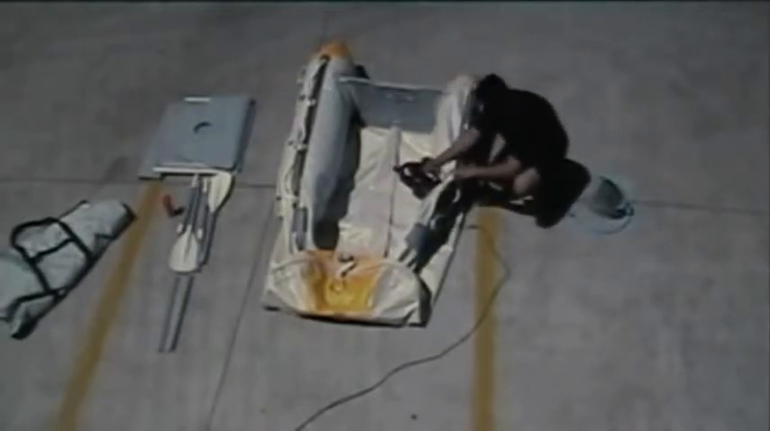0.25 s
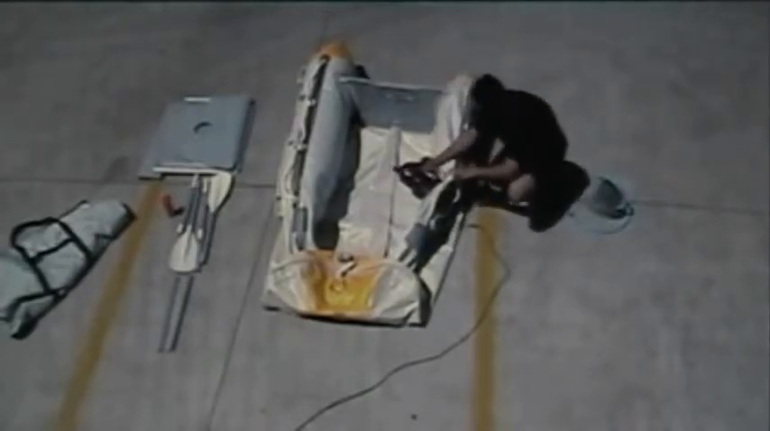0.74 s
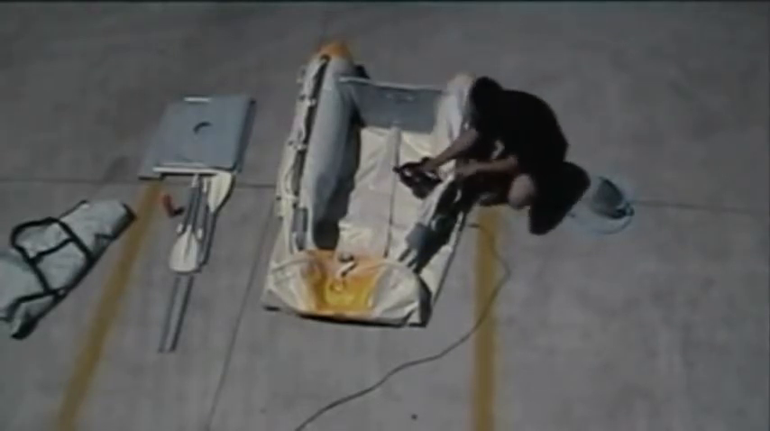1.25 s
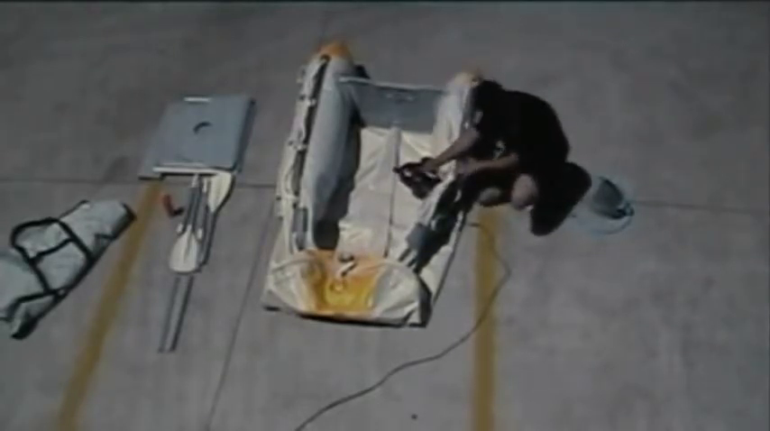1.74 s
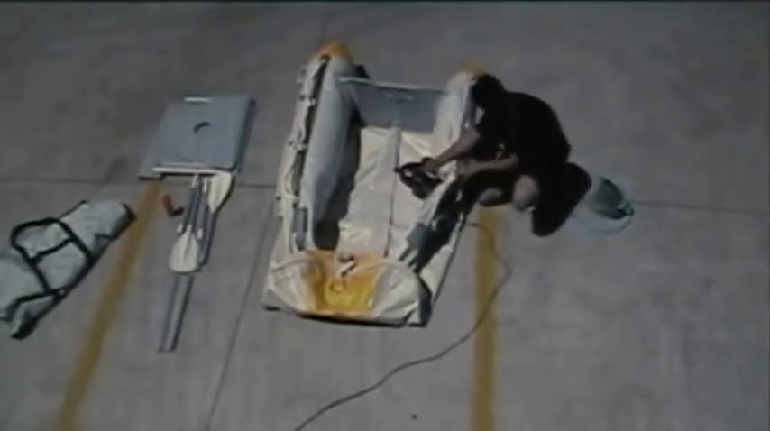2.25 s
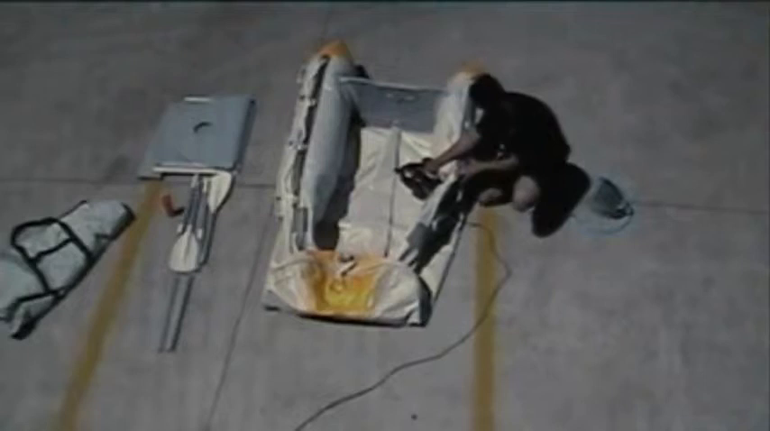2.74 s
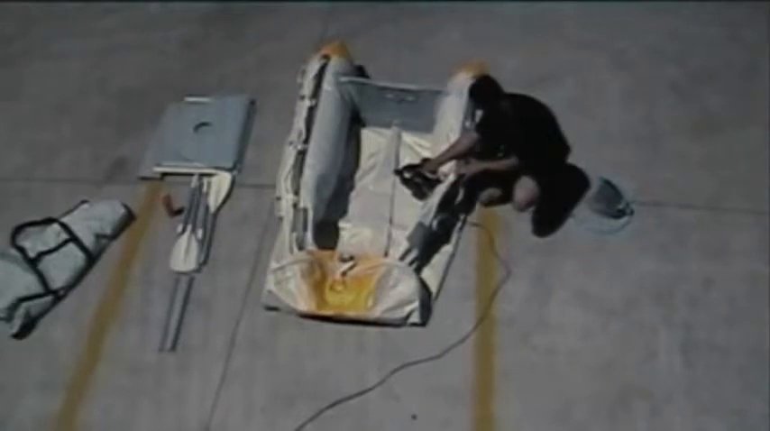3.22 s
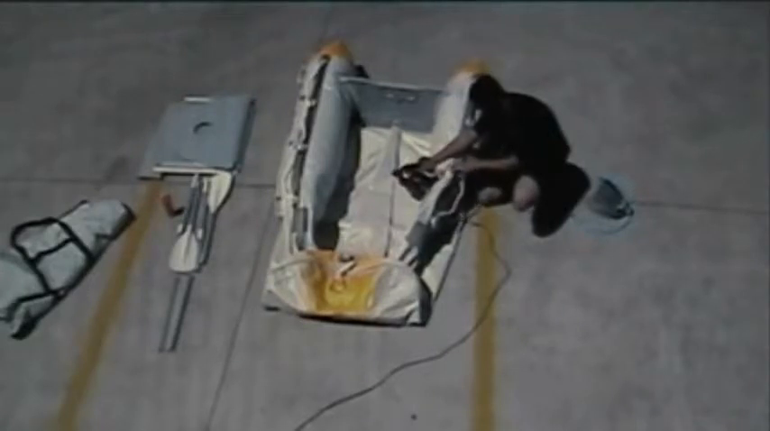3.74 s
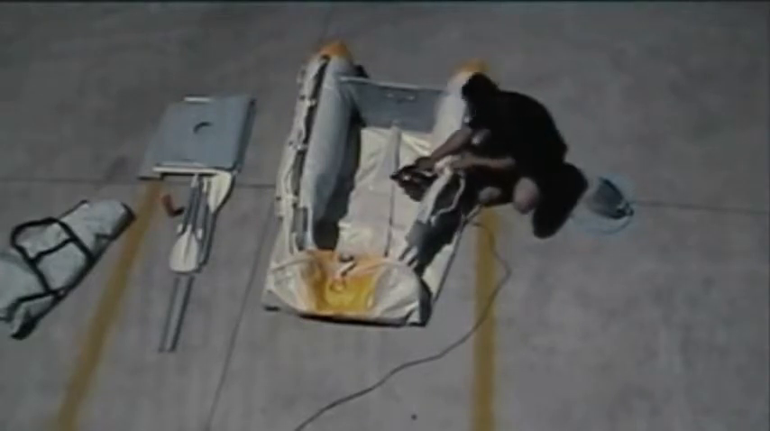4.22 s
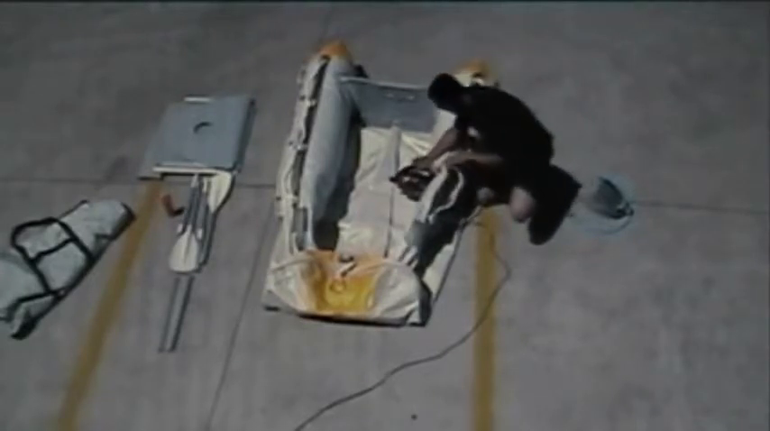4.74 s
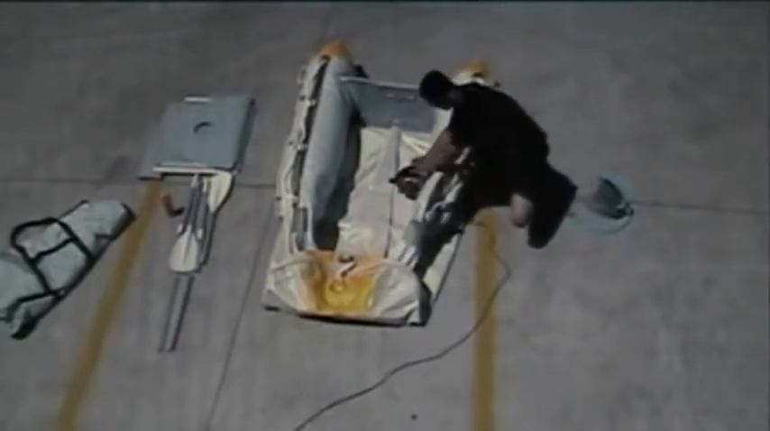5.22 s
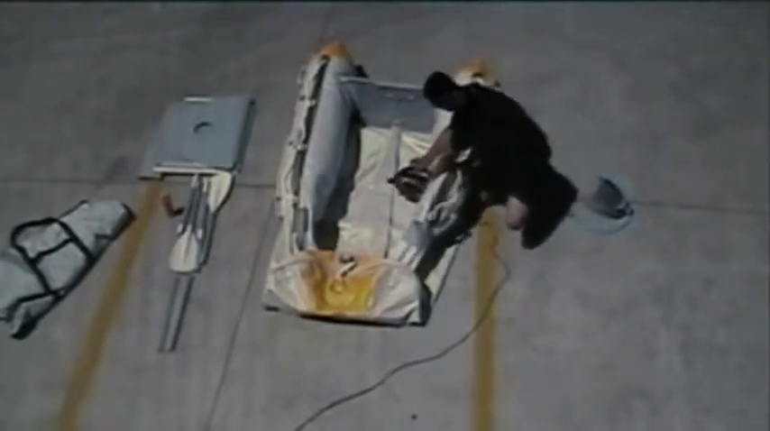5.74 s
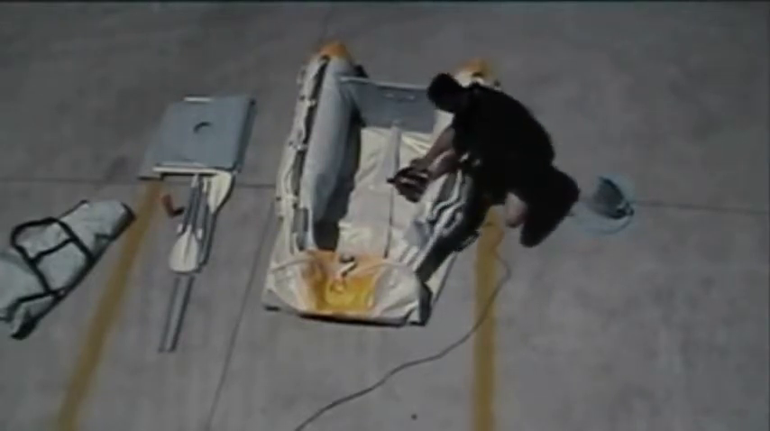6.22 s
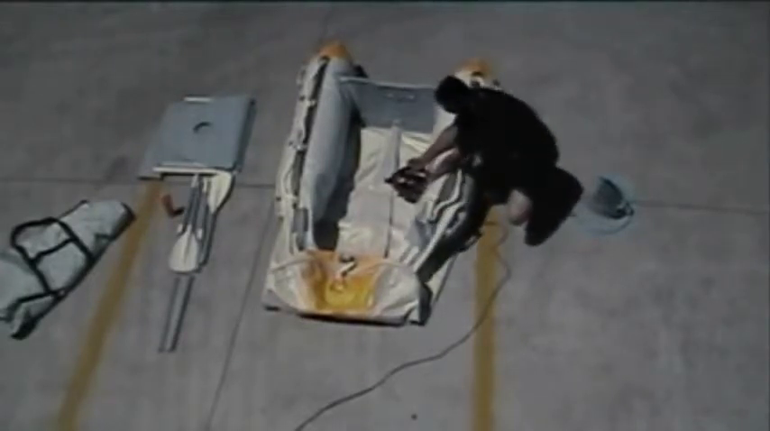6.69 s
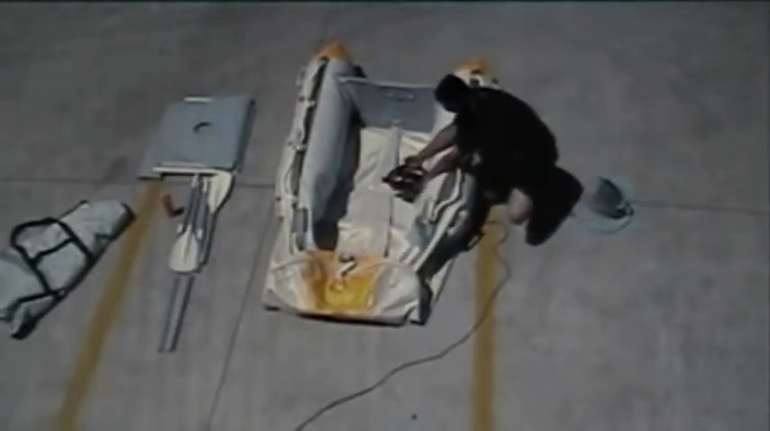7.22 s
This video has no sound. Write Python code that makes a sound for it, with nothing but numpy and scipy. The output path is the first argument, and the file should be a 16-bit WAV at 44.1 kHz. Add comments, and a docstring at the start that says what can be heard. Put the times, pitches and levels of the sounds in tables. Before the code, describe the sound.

An electric air blower runs throughout, pushing air into an inflatable boat with an even roar and hiss over a faint motor tone. After about a second the hose starts to sputter in soft, irregular puffs. Midway the sputtering stops, the valve whistles thinly and the hiss dulls a little. A brighter spurt of air and one last puff come near the end. The blower sits slightly right, with a short echo from a hard surface.

```python
"""A mains air blower runs steadily, held to the valve of an inflatable boat on a concrete floor.
From the start its shaft sings over a faint hum, while turbulent air roars in housing and hose, booms in
the boat's tube and hisses at the nozzle; a hard surface nearby returns a short echo. After a second the
hose begins to sputter. Midway the nozzle settles deeper into the valve: the sputter stops, the valve
whistles and the hiss dulls. Near the end come a bright spurt of air and one last puff."""
import sys
import numpy as np
from scipy import signal
from scipy.fft import rfft, irfft
from scipy.io import wavfile
from scipy.ndimage import uniform_filter1d

SR = 44100
rng = np.random.default_rng(int(sys.argv[2]) if len(sys.argv) > 2 else 0)


def file_out(sig):
    """Save sig as 16-bit WAV at sys.argv[1]."""
    # one column per channel
    cols = np.atleast_2d(sig).T
    # limit, then scale
    lim = np.clip(cols, -1, 1)
    pcm = np.round(lim * 32767).astype(np.int16)
    wavfile.write(sys.argv[1], SR, pcm)


N = 328986
TIME, HZ = np.arange(N) / SR, np.maximum(np.arange(N // 2 + 1) * SR / N, 1)


def from_db(db):
    """Amplitude ratio: tenfold for every 20 dB."""
    return 10 ** (np.asarray(db) / 20)

def in_time(points):
    """Linear interpolation of a curve at every sample."""
    return np.interp(TIME, *np.transpose(points))

def over_hz(points):
    """Linear interpolation on a log-frequency axis."""
    hz, value = np.transpose(points)
    return np.interp(np.log(HZ), np.log(hz), value)

def drift(rate_hz):
    """Random modulation: low-passed noise of rms 1."""
    slow = irfft(rfft(rng.standard_normal(N)) / (1 + (HZ / rate_hz) ** 2), N)
    return slow / np.sqrt(np.mean(slow ** 2) + 1e-20)

def swell(peak_s, length_s):
    """Hann window: a smooth rise to 1 and fall."""
    return np.cos(np.pi * np.clip((TIME - peak_s) / length_s, -.5, .5)) ** 2

def resonances(modes):
    """Incoherent sum: independently driven modes add in power."""
    gains = (from_db(db) / (1 + ((HZ - hz) / width) ** 2) for hz, width, db in modes)
    return np.sqrt(sum(gain ** 2 for gain in gains))

# Sound arriving from all round: frequency_hz, side_minus_mid_db
DIFFUSE_FIELD = [(60, -5), (150, -8), (200, -5), (330, -9), (550, -15), (800, -16), (1150, -6),
                 (1550, -11.5), (2200, -10.5), (3400, -8), (4500, -17), (6300, -5.5), (8200, -9),
                 (11000, -2.5), (15000, -3)]
def turbulence(colour, blur_hz=220):
    """Shaped noise as (mid, side), mid rms 1; multipath arrival blurs the side's resonances."""
    blurred = np.sqrt(np.abs(uniform_filter1d(colour ** 2, max(1, int(blur_hz * N / SR)))))
    side_colour = blurred * from_db(over_hz(DIFFUSE_FIELD))
    noise = irfft(rfft(rng.standard_normal((2, N))) * [colour, side_colour], N)
    return noise / np.std(noise[0])

def cavity(modes, level_db, flutter_db, flutter_hz):
    """Forced resonance: uneven turbulence drives a cavity's modes."""
    return from_db(level_db + flutter_db * drift(flutter_hz)) * turbulence(resonances(modes))

# Strength of the air flow: time_s, above_usual_db
AIR_FLOW = [(0, 0), (0.65, 1.4), (0.95, -2.2), (1.25, -0.8), (1.5, -1), (1.9, 0), (2.6, 0.5), (3.25, -1.5),
            (3.65, -0.5), (3.85, 0.5), (4.04, 0), (4.2, -3), (5.0, -2.5), (5.3, -1), (5.5, -2.5), (5.7, 3),
            (6.08, -1.7), (6.25, -0.3), (7.46, 0.7)]
def flow_db():
    """Continuity: one flow passes through housing, hose, nozzle and valve."""
    return in_time(AIR_FLOW)

# Background spectrum: frequency_hz, relative_density_db
RUMBLE_SPECTRUM = [(20, -28), (45, -8), (70, -0.5), (120, -9), (180, 1), (260, 3.5), (400, -10),
                   (1000, -19.5)]
def rumble(level_db):
    """Ambient noise: a steady floor, strongest in the bass."""
    return from_db(level_db) * turbulence(from_db(over_hz(RUMBLE_SPECTRUM)), blur_hz=20)

# Shaft rotation: time_s, speed_hz
SHAFT_SPEED = [(0, 555), (.9, 556.5), (1.85, 557), (2.8, 557.2), (4.0, 559.6), (4.7, 560.3), (5.4, 558.8),
               (6.4, 556.5), (7.46, 557.5)]
# Strength of the shaft's note: time_s, relative_level_db
SHAFT_LEVEL = [(0, -40), (.55, -40), (1.0, -43.5), (1.35, -37), (2.4, -40.5), (2.95, -47), (3.4, -36.5),
               (3.8, -37.5), (4.2, -40), (4.7, -39.5), (5.45, -44.5), (6.2, -37.5), (6.7, -35),
               (7.05, -42.5), (7.46, -45.5)]
def motor(wobble_hz, waver_db, note_gain_db=0.5, whine_db=-53, whine_order=6):
    """Rotating imbalance: the shaft sings at its turning rate, the impeller at a harmonic."""
    speed_hz = in_time(SHAFT_SPEED) + wobble_hz * drift(7.8)  # trembles under the load
    angle = 2 * np.pi * np.cumsum(speed_hz) / SR
    note = from_db(in_time(SHAFT_LEVEL) + note_gain_db + waver_db * drift(8.0)) * np.sin(angle)
    whine = from_db(whine_db + waver_db * drift(4.9)) * np.sin(whine_order * angle)
    return np.sqrt(2) * (note + whine)

# Machine tones: pitch_hz, rms_level_db
HUM_TONES = [(48.4, -74), (99, -80), (149, -74), (296.1, -64.5), (339.1, -67), (764.4, -56.5), (1148, -52),
             (1286, -49)]
def hum(wander, waver_db):
    """Superposition: faint tones of nearly fixed pitch, each wavering in level."""
    clock = TIME + wander * np.cumsum(drift(4.1)) / SR
    return np.sqrt(2) * sum(from_db(db + waver_db * drift(1.9)) * np.sin(2 * np.pi * hz * clock)
                            for hz, db in HUM_TONES)

# Modes of the blower's housing: centre_hz, half_width_hz, relative_level_db
HOUSING_RESONANCES = [(1199, 34, -9.5), (1298, 40, -3.5), (1354, 23, 1.5), (1396, 29, -3), (1627, 33, -1),
                      (2046, 68, -6.5), (2225, 35, -10), (2314, 39, -10.5), (2283, 260, -7),
                      (2560, 59, -8.5), (2697, 5.7, -2.5), (2650, 150, -13), (2990, 190, -15)]
def housing_roar(level_db):
    """Cavity resonance: the housing roars in proportion to the flow."""
    return cavity(HOUSING_RESONANCES, level_db + flow_db(), flutter_db=0.5, flutter_hz=28)

# Modes of the hose: centre_hz, half_width_hz, relative_level_db
HOSE_RESONANCES = [(767, 24, 0), (816, 35, -3.5), (909, 61, -6)]
def hose_roar(level_db, tube_coupling=0.24):
    """Acoustic coupling: the hose follows the flow and shares the swing of the tube it opens into."""
    drive_db = level_db + flow_db() + tube_coupling * aim_db()
    return cavity(HOSE_RESONANCES, drive_db, flutter_db=1.0, flutter_hz=21)

# Modes of the boat's tube: centre_hz, half_width_hz, relative_level_db
TUBE_RESONANCES = [(208, 72, -28.5), (448, 28.3, -9.5), (543, 34, -0.5), (570, 21, -5), (627, 31, -1)]
# Boom inside the tube as the nozzle's aim changes: time_s, level_db
BOOM_LEVEL = [(0, -38), (1.1, -34), (1.8, -31.5), (3.6, -30.5), (3.9, -26.5), (4.08, -30), (4.2, -38.5),
              (5.1, -40), (5.3, -37), (5.48, -40.5), (5.7, -35), (7.0, -36), (7.2, -33.5), (7.46, -31)]
def tube_boom(wall_loss_db):
    """Transmission loss: the tube's air resonates and is heard through its wall."""
    return cavity(TUBE_RESONANCES, in_time(BOOM_LEVEL) - wall_loss_db, flutter_db=0.6, flutter_hz=22)

def aim_db():
    """Varying excitation: the nozzle's aim swings the boom about its mean level."""
    boom_db = in_time(BOOM_LEVEL)
    return boom_db - boom_db.mean()

# Modes of the gap between nozzle and valve: centre_hz, half_width_hz, relative_level_db
GAP_RESONANCES = [(1522, 49, -2), (1595, 16, -3.5)]
# Strength of their ring: time_s, level_db
GAP_LEVEL = [(0, -33.5), (1.1, -37), (1.3, -35), (1.9, -32.5), (2.4, -35), (3.68, -37.5), (3.86, -30),
             (4.04, -37), (4.2, -40), (5.5, -42), (5.8, -35), (6.05, -36), (7.46, -39)]
def gap_ring():
    """Slit resonance: the gap rings louder and softer as the hands shift."""
    return cavity(GAP_RESONANCES, in_time(GAP_LEVEL), flutter_db=0.86, flutter_hz=12)

# Modes of the valve: centre_hz, half_width_hz, relative_level_db
VALVE_RESONANCES = [(1703, 21, 0.5), (1778, 28, 2.5), (1831, 29, 3), (1920, 76, -6.5)]
def valve_ring(level_db, flow_share=0.5, seated_gain_db=3):
    """Cavity resonance: the valve's ring grows with the flow and as the nozzle seats."""
    drive_db = level_db + flow_share * flow_db() + seated_gain_db * seating()
    return cavity(VALVE_RESONANCES, drive_db, flutter_db=0, flutter_hz=33)

# Relative spectrum of the jet: frequency_hz, loose_db, seated_db
JET_SPECTRUM = [(150, -29.5, -31), (403, -11, -11.5), (850, -14, -2), (1070, -12, -9), (1400, -3, -6),
                (3350, -4.5, -4), (4320, -6, -6.5), (5030, -8.5, -8), (6830, -4, -6), (7800, 0.5, 1),
                (8280, -1.5, -2), (8520, -1.5, -4.5), (9230, -3, -2.5), (11100, -11, -12), (11700, -8, -9),
                (14000, -12, -11.2), (15100, -19.5, -20.5)]
# Its narrow whistles, on the same scale: centre_hz, half_width_hz, loose_db, seated_db
JET_PEAKS = [(4400, 60, -2.5, -6), (6205, 33, -0.5, -3), (6864, 17, -6, -6), (7420, 60, -10, 1),
             (7800, 60, -8, -5), (8025, 41, 3, -8), (8268, 30, -4, -1), (8410, 20, -6, -2),
             (9560, 24, -4, -10), (12170, 65, -9, -8)]
def jet_noise(seated):
    """Jet noise: broadband hiss and thin whistles add in power, for a loose or a seated nozzle."""
    bed = over_hz([(hz, db[seated]) for hz, *db in JET_SPECTRUM])
    whistles = resonances([(hz, width, db[seated]) for hz, width, *db in JET_PEAKS])
    return turbulence(np.hypot(from_db(bed), whistles))

# Spurts of air past the nozzle's rim: peak_s, length_s, hiss_gain_db, extra_treble_db
RIM_SPURTS = [(.3, 1.1, 1.7, 0.2), (3.6, 1.1, -0.3, 1.3), (5.754, 0.47, 0.5, 3)]
def nozzle_hiss(level_db, flow_share=0.072, aim_share=0.063, flutter_db=0.4, treble_hz=5500):
    """Equal-power crossfade from loose jet to seated jet; seating dulls it, spurts brighten it."""
    depth = seating()
    hiss = np.sqrt(1 - depth) * jet_noise(seated=False) + np.sqrt(depth) * jet_noise(seated=True)
    treble = irfft(rfft(hiss) / (1 + (treble_hz / HZ) ** 8), N)
    hiss_db = level_db + flow_share * flow_db() + aim_share * aim_db() + 0.65 * depth
    treble_db = 0.84 - 1.46 * depth
    for peak_s, length_s, gain_db, extra_db in RIM_SPURTS:
        hiss_db += gain_db * swell(peak_s, length_s)
        treble_db += extra_db * swell(peak_s, length_s)
    return from_db(hiss_db + flutter_db * drift(15.0)) * (hiss + (from_db(treble_db) - 1) * treble)

def reflections(t60_s, level_db):
    """Reverberation: the frequency response of dense, exponentially decaying reflections."""
    tail = rng.standard_normal(N) * from_db(-60 * np.minimum(TIME / t60_s, 4))
    return from_db(level_db) * rfft(tail / np.linalg.norm(tail))

# Echo from the hard surface: frequency_hz, amplitude_ratio
ECHO_STRENGTH = [(500, 0), (1400, 0.02), (2700, 0.41), (3600, 0.37), (4600, 0.03), (5400, 0.66),
                 (6300, 0.27), (8300, 0.56), (9600, 0.4), (11000, 0.3), (12800, 0.4), (14600, 0.3)]
def surroundings(sound, echo_s=0.007735, scatter_hz=3070):
    """Comb filtering: an echo interferes with the mid; small things scatter treble; a tail follows."""
    mid, side = sound
    echo = over_hz(ECHO_STRENGTH) * np.exp(-2j * np.pi * HZ * echo_s)
    scatter = reflections(t60_s=0.049, level_db=-8.5) / (1 + (scatter_hz / HZ) ** 2)
    tail = reflections(t60_s=0.39, level_db=-12)
    return np.array([irfft(rfft(mid) * (1 + echo + scatter + tail), N), side])

# Puffs of the sputtering hose: peak_s, level_db
HOSE_PUFFS = [(1.334, -34), (1.498, -33), (1.69, -29), (1.806, -28), (2.134, -30), (2.335, -28),
              (2.435, -29), (2.834, -29.5), (2.901, -29), (3.156, -31), (3.323, -34), (3.388, -30),
              (3.435, -29), (3.746, -30), (3.933, -27), (4.096, -34), (7.195, -31)]
def sputter(length_s=0.041, centre_hz=560, half_width_hz=29, even_s=0.012):
    """Pulsed excitation: short, even gusts drive the tube's main resonance."""
    gust = turbulence(resonances([(centre_hz, half_width_hz, 0)]), blur_hz=40)
    running_rms = np.sqrt(uniform_filter1d(gust[0] ** 2, int(even_s * SR)) + 1e-3)
    return gust / running_rms * sum(from_db(db) * swell(peak_s, length_s) for peak_s, db in HOSE_PUFFS)

# Whistles at the valve's lip: peak_s, length_s, pitch_hz, glide_hz_per_s, level_db
LIP_TONES = [(3.96, .36, 1617, 219.5, -34), (4.95, 1, 1314, -29.5, -40), (5.05, 1.9, 1828, -1, -37.5),
             (6.1, 1.5, 1718, 1, -37), (6.36, .3, 1785, 0.5, -33), (6.6, 3.4, 1833, 0, -40.5)]
def valve_whistles(wobble_hz, waver_db):
    """Edge tones: air catches the valve's lip and whistles, unsteady in pitch and level."""
    tones = 0
    for peak_s, length_s, hz, glide, db in LIP_TONES:
        pitch_hz = hz + glide * (TIME - peak_s) + wobble_hz * drift(14)
        envelope = from_db(db + waver_db * drift(8.2)) * swell(peak_s, length_s)
        tones += envelope * np.sin(2 * np.pi * np.cumsum(pitch_hz) / SR)
    return np.sqrt(2) * tones

def seating(start_s=4.04, length_s=1.34):
    """Linear ramp: the nozzle's depth in the valve, from 0 (loose) to 1 (seated)."""
    return np.clip((TIME - start_s) / length_s, 0, 1)

# Balance of the microphone pair: frequency_hz, left_minus_right_db
STEREO_BALANCE = [(150, 0.5), (500, -1), (900, -1.5), (1280, 1), (1750, -2.5), (2200, -1.5), (2600, 0.2),
                  (5000, -0.5), (7000, -1), (11000, -1.5), (15000, -1)]
def scene():
    """Mid-side stereo: the sources add, and a level difference sets the blower slightly right."""
    background = rumble(level_db=-61)
    air = tube_boom(wall_loss_db=6) + sputter()
    air += hose_roar(level_db=-39) + housing_roar(level_db=-30.5)
    air += gap_ring() + valve_ring(level_db=-36.5) + nozzle_hiss(level_db=-33)
    mid, side = surroundings(air) + background
    mid += valve_whistles(wobble_hz=8.01, waver_db=3.5)
    mid += motor(wobble_hz=0.74, waver_db=1.4) + hum(wander=0.00056, waver_db=2.5)
    balance = from_db(over_hz(STEREO_BALANCE) / 2 * [[1], [-1]])
    return irfft(rfft([mid + side, mid - side]) * balance, N)

def record(dry):
    """Band limiting: the microphone loses the lowest bass, and the top is cut steeply."""
    high_pass = signal.butter(2, 40, "high", fs=SR, output="sos")
    low_pass = signal.ellip(12, .1, 90, 15200, fs=SR, output="sos")
    return signal.sosfilt(low_pass, signal.sosfilt(high_pass, dry))


dry = scene()
out = record(dry)
file_out(out)
```